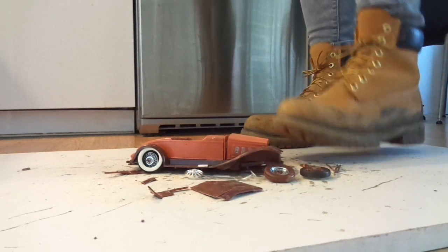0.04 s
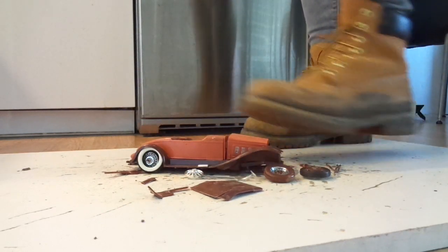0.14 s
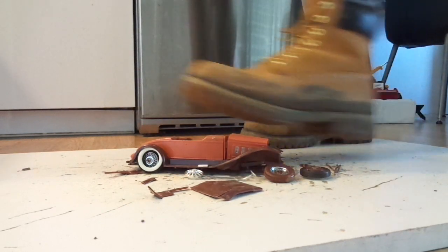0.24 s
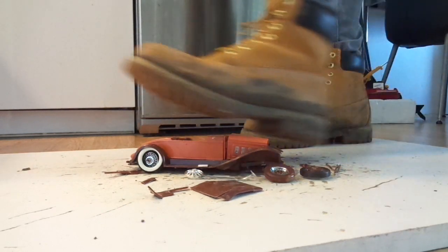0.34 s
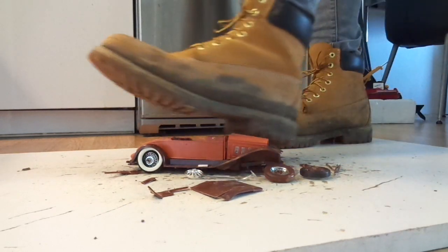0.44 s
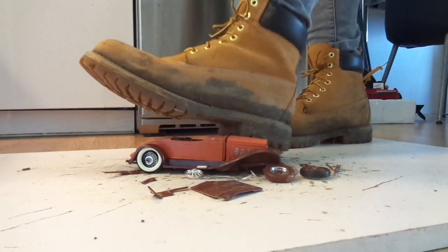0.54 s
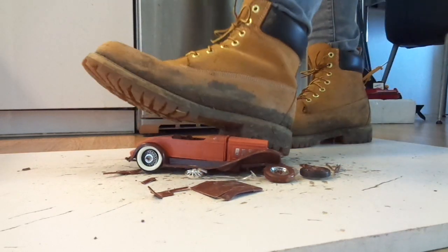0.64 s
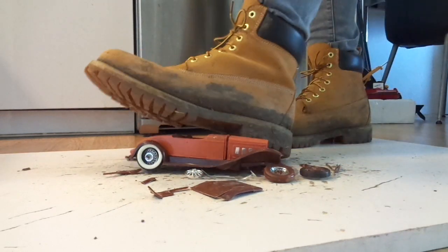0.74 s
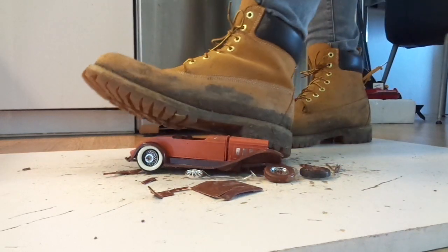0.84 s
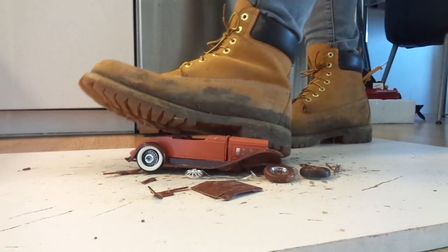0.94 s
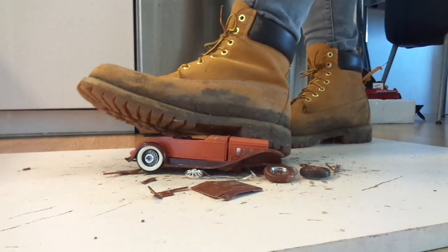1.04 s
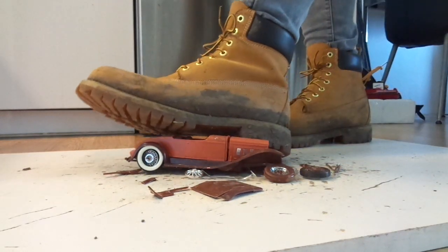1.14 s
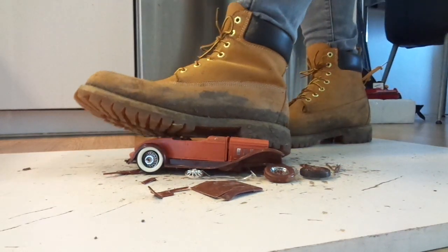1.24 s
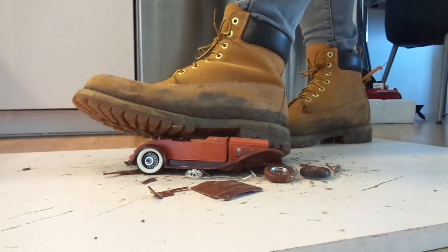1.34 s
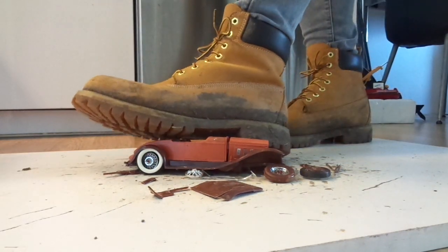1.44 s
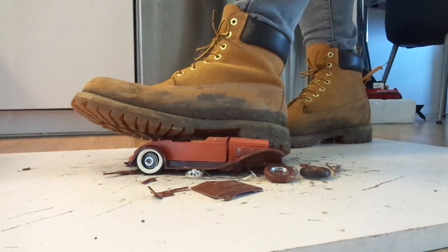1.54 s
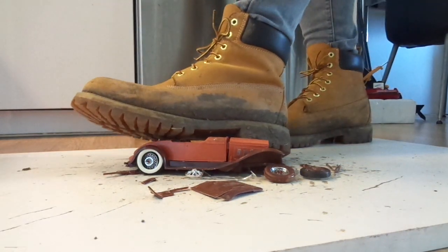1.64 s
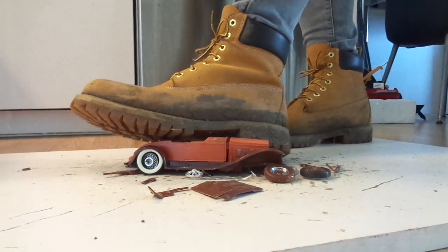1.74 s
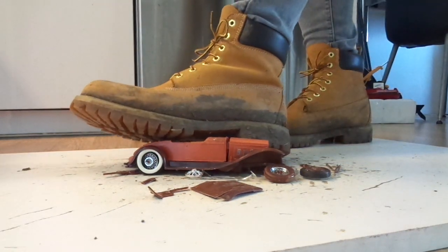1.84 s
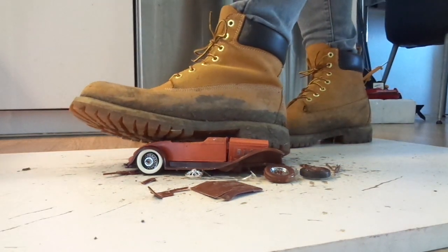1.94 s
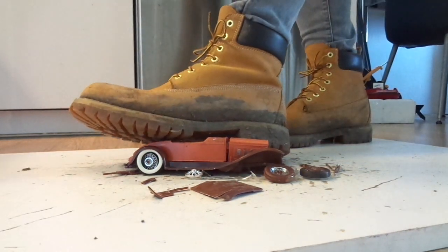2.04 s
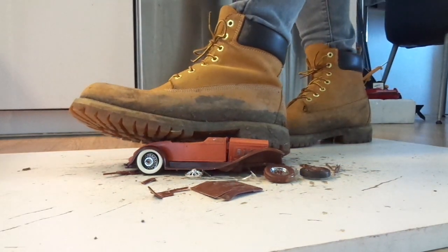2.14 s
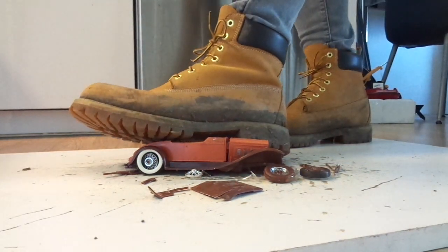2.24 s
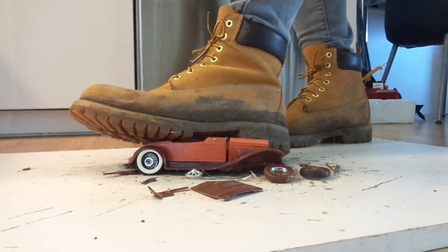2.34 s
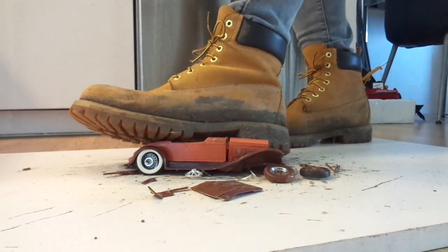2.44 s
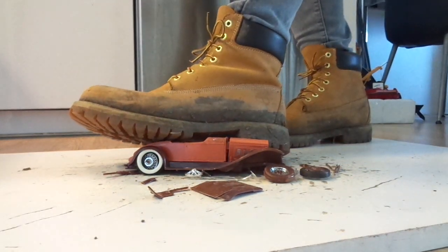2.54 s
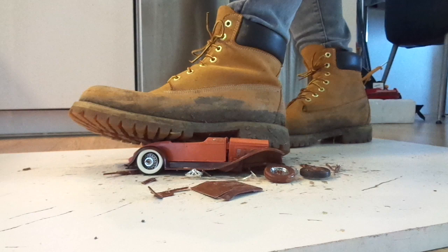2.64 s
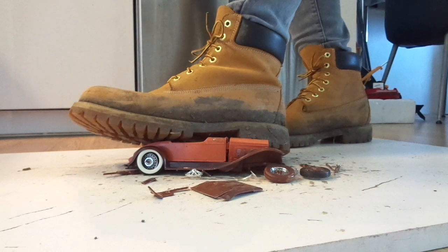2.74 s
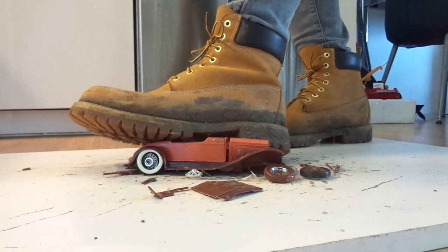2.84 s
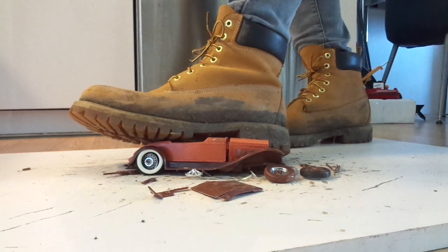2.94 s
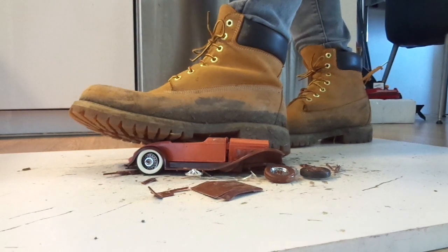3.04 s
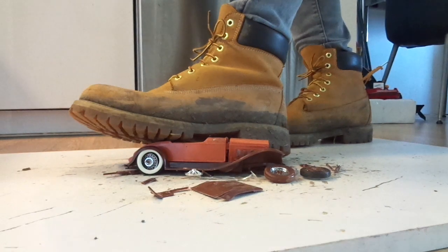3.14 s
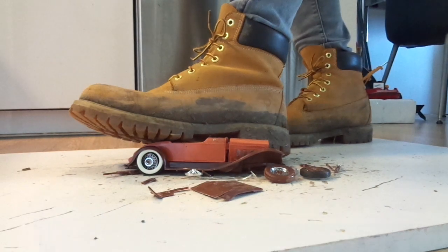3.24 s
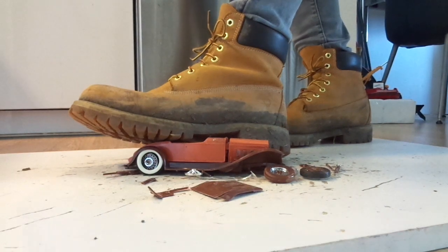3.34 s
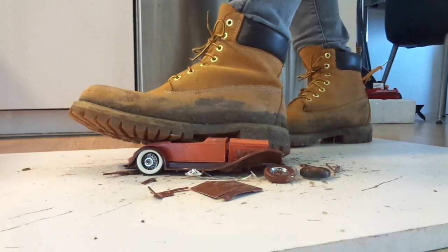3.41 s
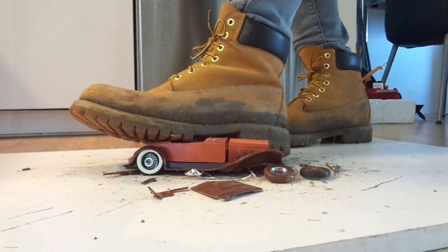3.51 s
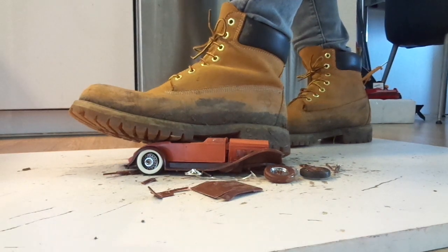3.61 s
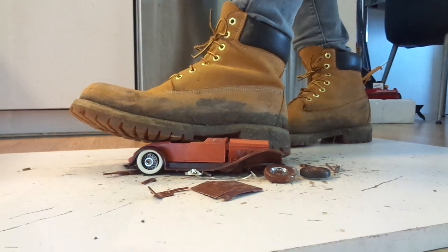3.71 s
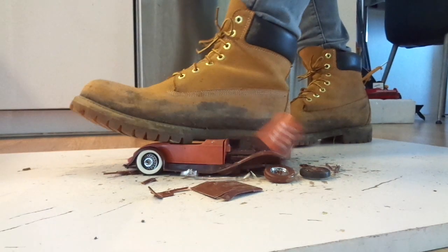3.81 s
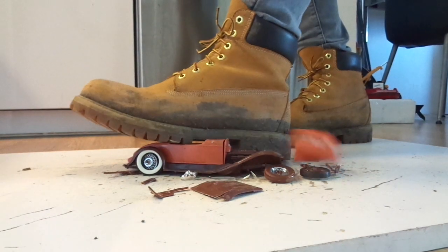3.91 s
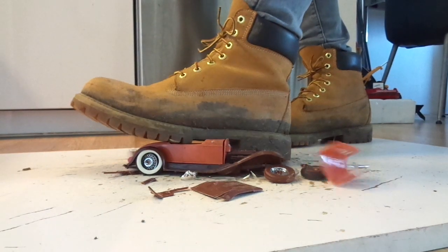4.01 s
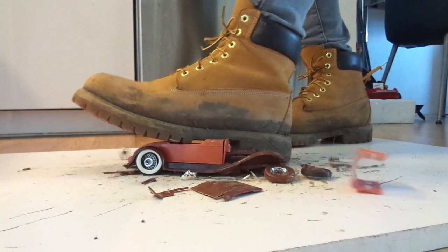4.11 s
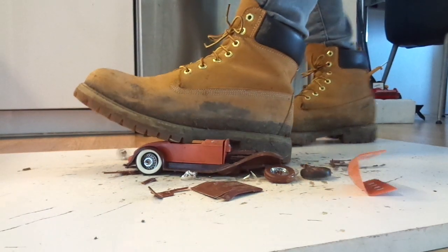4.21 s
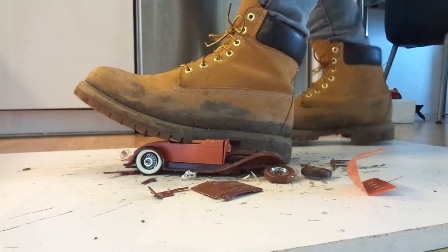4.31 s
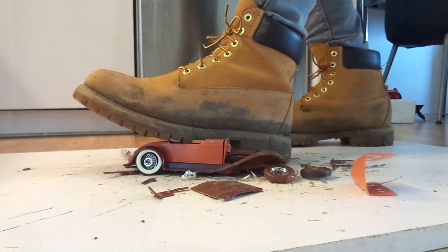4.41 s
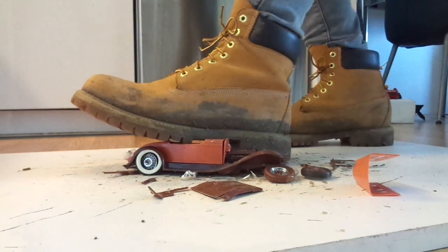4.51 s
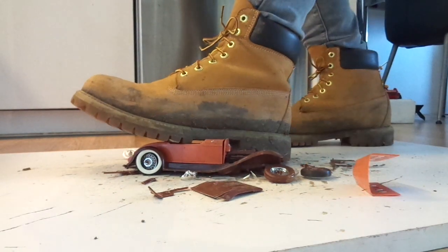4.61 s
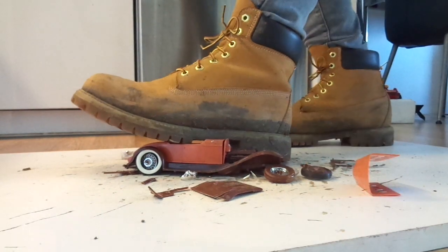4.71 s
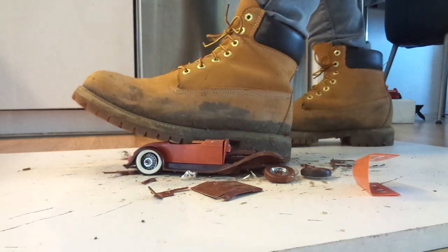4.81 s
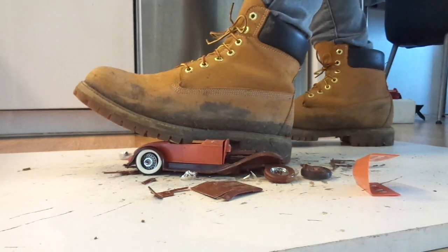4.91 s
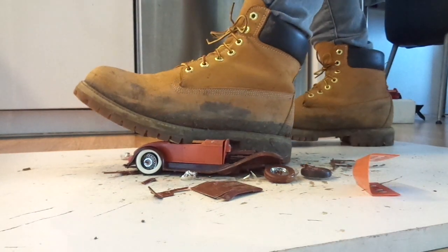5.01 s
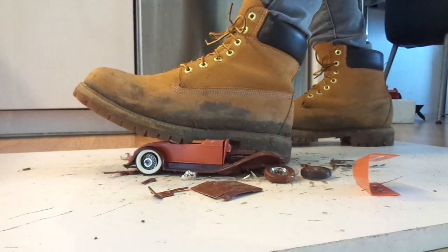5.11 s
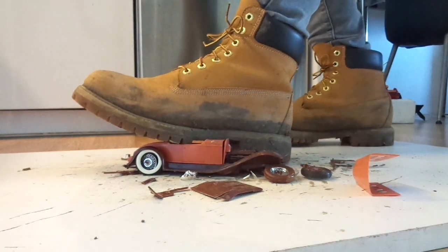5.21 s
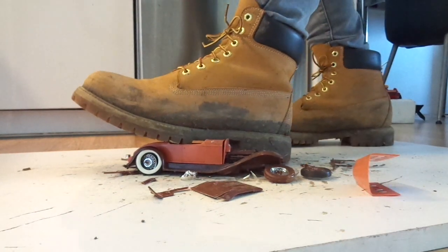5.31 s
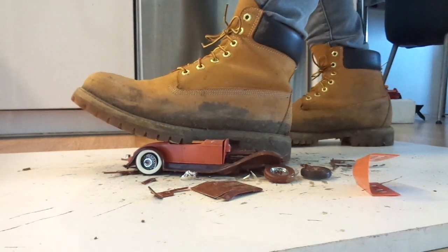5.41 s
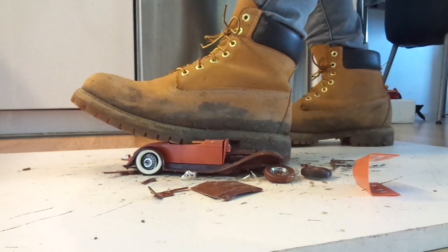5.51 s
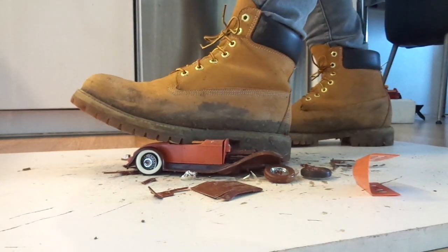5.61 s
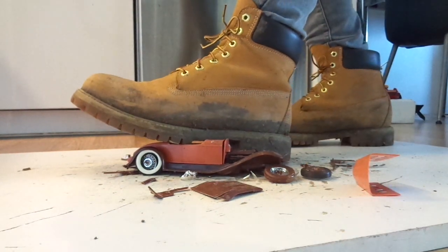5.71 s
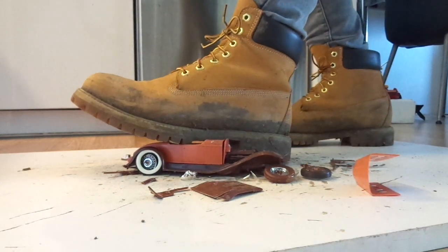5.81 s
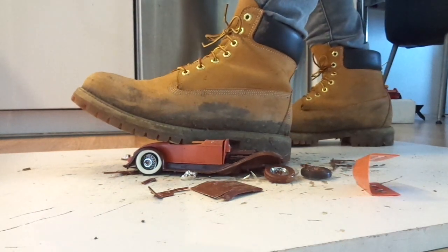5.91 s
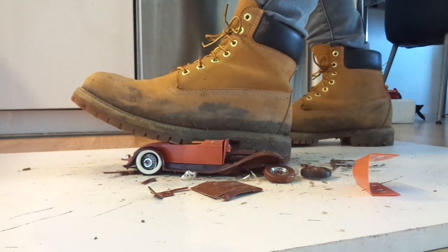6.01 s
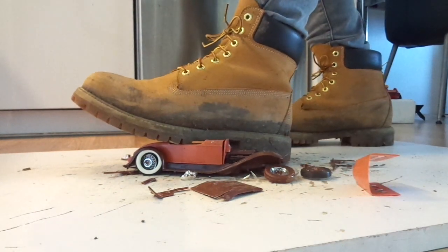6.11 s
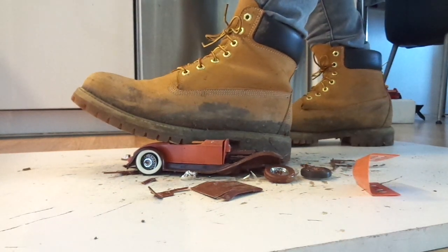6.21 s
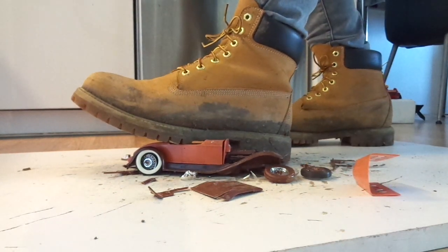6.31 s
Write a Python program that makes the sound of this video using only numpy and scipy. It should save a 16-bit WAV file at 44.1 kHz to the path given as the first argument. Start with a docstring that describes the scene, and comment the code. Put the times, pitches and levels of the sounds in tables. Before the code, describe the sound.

Faint hiss in a hard-walled kitchen gives way to gritty crackling and a run of brittle snaps as a boot bears down on a plastic toy car. Isolated cracks lead to one big break that thumps the board beneath and clips the nearby microphone. Chips scatter, fragments grind and knock together, and the crackle dies away. Each snap has a brief room echo.

```python
"""Over a faint room hiss, plastic starts to crackle, clack and snap: a heavy boot is slowly crushing
a brittle model car on a board in a bare kitchen. Splinters grind under the sole, loose pieces knock
together, and each break is a tiny burst that rings the broken piece. A low hum swells briefly and a thin
part pings. Near 3.8 s one big collapse thuds on the board, scatters shards and overloads the microphone.
The hard room answers every snap."""
import sys
import numpy as np
from scipy import signal
from scipy.fft import rfft, irfft, next_fast_len
from scipy.io import wavfile

SR = 44100
rng = np.random.default_rng(int(sys.argv[2]) if len(sys.argv) > 2 else 0)


def to_wav(sig):
    """Store sig (one row per channel, or 1-D mono) as 16-bit WAV at the path in sys.argv[1].

    Samples outside -1..1 are clipped; the rate is SR.
    """
    pcm = np.clip(np.atleast_2d(sig), -1, 1) * 32767
    pcm = np.round(pcm).astype(np.int16)
    wavfile.write(sys.argv[1], SR, pcm.T)  # frames by channels


N = 280166
T = np.arange(N) / SR


def undb(db):
    """Turn decibels into a number to multiply by."""
    return 10 ** (np.asarray(db) / 20)


def unit(x):
    """Scale each row to an energy of one."""
    return x / np.sqrt(np.sum(x ** 2, axis=-1, keepdims=True))


def fade(t, t60):
    """Die away by 60 dB in t60 seconds, the 'fade time' of the tables."""
    return np.exp(-np.log(1000) * t / np.maximum(t60, 1e-4))


def band(x, lo_hz, hi_hz, order=4):
    """Keep what lies between two pitches; a higher order cuts more sharply."""
    edges = [lo_hz, min(max(hi_hz, lo_hz + 20), SR / 2 - 20)]
    return signal.sosfilt(signal.butter(order, edges, "band", fs=SR, output="sos"), x)


def ring(t, hz, t60):
    """One fading note of a struck object."""
    return np.sin(2 * np.pi * hz * t) * fade(t, t60)


def add(track, start_s, sound):
    """Mix a sound into a track at a given time."""
    i = max(int(start_s * SR), 0)
    track[i:i + len(sound)] += sound[:N - i]


def coloured(points):
    """Noise of strength one, with its tone shaped by (f/Hz, level/dB) points."""
    hz, db = np.transpose(points)
    size = next_fast_len(N)
    f = np.maximum(np.fft.rfftfreq(size, 1 / SR), 1)
    gain = undb(np.interp(np.log(f), np.log(hz), db))
    noise = irfft(rfft(rng.standard_normal(size)) * gain, size)[:N]
    return unit(noise) * np.sqrt(N)


# the tone of the room's steady noise: f/Hz, relative level/dB
HISS_TONE = [(25, -24), (50, -17.5), (85, -8.5), (130, -9), (165, -6), (215, 0), (350, -9), (530, -6),
             (1200, -7), (2000, -10.5), (3200, -15.5), (8000, -19), (15000, -20)]

def room_hiss(level_db=-56, side_db=-18):
    """Steady room noise and hiss, slightly different in the left and right ear."""
    middle = coloured(HISS_TONE)
    side = undb(side_db) * coloured(HISS_TONE)
    return undb(level_db) * np.array([middle + side, middle - side])


def push(start_s, hold_s, release_t60, rise_s=0.041):
    """The boot's pressure rises, holds, then dies away."""
    age = T - start_s
    return np.clip(age / rise_s, 0, 1) * fade(np.maximum(age - rise_s - hold_s, 0), release_t60)


# pushes that grind the splinters: start t/s, hold/s, level/dB
PUSHES = [(0.526, 0.051, -37.5), (0.682, 0.015, -33.5), (1.347, 0.022, -40), (2.939, .04, -56),
          (3.841, 0.3, -29.5)]
# the grinding's tone: low f/Hz, high f/Hz, relative level/dB at peak load, dB gained per dB of load
GRIND_TONE = [(200, 960, -21.5, 1), (620, 1160, -20, 1), (1110, 2700, -5, 1.12), (2400, 6400, -5.5, 1.3),
              (5600, 10000, -12.5, 1.7), (9900, 16000, -21, 2)]

def grinding(idle_per_s=120, per_s_per_load=30000, click_t60=0.0095):
    """Splinters click under the sole: lone ticks under a light load, a bright crunch under a heavy one."""
    load = undb(-60.5) * push(0.44, hold_s=4.76, release_t60=3.0)  # resting weight keeps it crackling
    for start_s, hold_s, db in PUSHES:
        load += undb(db) * push(start_s, hold_s, release_t60=0.42)
    clicks_per_s = idle_per_s + per_s_per_load * load
    clicks = rng.random(N) < clicks_per_s / SR
    click_fade = fade(T[:SR // 30], click_t60)
    energy = signal.oaconvolve(clicks / clicks_per_s, click_fade ** 2)[:N]
    shake = np.sqrt(np.abs(energy))
    out = np.zeros(N)
    for lo_hz, hi_hz, db, growth in GRIND_TONE:
        gain = undb(db) * (load / load.max()) ** growth
        out += gain * unit(band(shake * rng.standard_normal(N), lo_hz, hi_hz, order=3))
    return out * np.sqrt(N) * load.max()


# the car body's own notes: f/Hz, level/dB before a lift of the high notes, fade time/s
BODY_NOTES = [(299.5, -6.5, 0.24), (1096, -17.5, 0.03), (1300, -7, 0.25), (1547, -11, 0.052),
              (1860, -4.5, 0.015), (2610, -13.5, .04), (4750, -14, 0.053), (5120, -4.5, 0.016)]

def car_body(shocks, level_db=-16):
    """Every shock leaves the rest of the car ringing faintly."""
    t = T[:SR // 2]
    notes = sum(undb(db) * unit(ring(t, hz, t60)) * np.sqrt(hz) for hz, db, t60 in BODY_NOTES)
    return undb(level_db) * signal.fftconvolve(shocks, unit(notes))[:N]


# the long tail of the kitchen's echo: f/Hz, fade time/s, relative level/dB
ECHO_TAIL = [(150, 0.23, -3.5), (524, 0.77, 2), (1330, 0.91, -3), (3020, 0.74, 2.5), (5040, 0.71, -3),
             (8000, .55, 1), (13050, 0.46, 1)]

def kitchen_echo(sound, early_db=-17, early_t60=0.13, tail_db=-15, gap_s=0.0021):
    """Sound bounces off board and cupboards, then blurs into a tail whose middle pitches last longest."""
    t = T[:SR]
    log_f = np.log(np.maximum(np.fft.rfftfreq(SR, 1 / SR), 1))
    centres = np.log([row[0] for row in ECHO_TAIL])
    spectrum = rfft(rng.standard_normal(SR))
    tail = np.zeros(SR)
    for (_, t60, db), this_band in zip(ECHO_TAIL, np.eye(len(ECHO_TAIL))):
        noise = irfft(spectrum * np.interp(log_f, centres, this_band), SR)
        tail += undb(db) * fade(t, t60) * noise
    early = rng.standard_normal(SR) ** 3 * fade(t, early_t60)  # cubing makes a few bounces stand out
    echo = undb(early_db) * unit(early * (t > gap_s)) + undb(tail_db) * unit(tail * (t > 2 * gap_s))
    return signal.oaconvolve(sound, echo)[:N]


# pitch ranges where the plastic shell rings: low f/Hz, high f/Hz, fade time as a multiple of the burst's
SHELL_RANGES = [(935.5, 2200, 2.1), (2037, 3600, 1.3), (3734, 5500, 0.84), (5340, 8880, 0.79)]

def shell_bursts(events, tone, note_gains, boost_db=20, rise_s=0.00018):
    """Each crack or knock shakes the shell into a burst of noise; the piece's own notes stand out."""
    t = T[:SR // 12]
    _, level_db, bright_db, hollow_db, t60, *notes_hz = np.transpose(events)[:, :, None]
    rise = 1 - np.exp(-t / rise_s)

    def burst(lo_hz, hi_hz, length, order=4):
        """Fading noise in one pitch range, a row for each event."""
        noise = rng.standard_normal((len(events), len(t))) * rise * fade(t, t60 * length)
        return unit(band(noise, lo_hz, hi_hz, order))

    parts = [burst(*row) for row in SHELL_RANGES]
    for k, hz, gain in zip((0, 2), notes_hz, note_gains):  # low note in range 0, any high note in range 2
        note = unit(rise * ring(t, hz, t60 * SHELL_RANGES[k][2]))
        parts[k] = unit(parts[k] + gain * note)
    parts[0] += undb(-19) * burst(560, 980, length=1)  # a hollow edge below the lowest range
    parts[-1] += undb(-7) * burst(8200, 14000, length=1.1, order=2)  # a spit of splinters on top
    shell = sum(part * undb(db + slope * bright_db) for part, (db, slope) in zip(parts, tone))
    cavity = undb(hollow_db) * burst(230, 450, length=1.9)  # the space under the shell
    out = np.zeros(N)
    for event, sound in zip(events, undb(level_db + boost_db) * (shell + cavity)):
        add(out, event[0], sound)
    return out


# knocks: t/s, relative level/dB, brightness/dB, hollowness/dB, burst fade time/s, note f/Hz
CLACKS = [(0.5623, -36, 2, -5, 0.021, 1687), (0.5899, -36.5, 11.5, -18, .022, 1800),
          (0.65, -50, 15, -8, 0.025, 2130), (0.7448, -39, -4, -22.5, 0.0084, 1500),
          (0.8155, -32, 2.5, -34, 0.022, 1250), (0.8232, -36.5, 8, -12.5, 0.021, 1350),
          (0.87, -29, 7, -11, 0.027, 1840), (1.6449, -39.5, 7, -10, 0.037, 1003),
          (1.963, -23.5, -7, -10.5, 0.037, 1125), (3.019, -44.5, 1, -4, .035, 874),
          (3.2053, -46, -9, -7.5, 0.0082, 990), (3.7915, -10.5, 0.5, -4.5, 0.01, 1800),
          (3.8025, -13, -4.5, -8.5, 0.014, 1000), (3.8075, -10.5, -5.5, -25.5, 0.0069, 1650),
          (3.8185, -14, 0, -12, 0.011, 1030), (4.1245, -18.5, 11, -42, 0.016, 1180),
          (4.3345, -18.5, -8.5, -30.5, 0.02, 1190), (4.3655, -30, -8, -23, 0.013, 1010),
          (4.3921, -31.5, 3, -3, 0.035, 1320), (4.9263, -26, 8.5, -27, 0.0081, 1390),
          (4.9828, -22, -1, -12, 0.026, 992), (5.342, -51, 16, -2, 0.022, 1090)]
# a knock's share in each shell range: level/dB, dB gained per dB of brightness
CLACK_TONE = [(2.5, 0), (-11.5, 0.96), (-12.5, 1), (-16, 0.44)]

def clacks():
    """Loose pieces knock together and on the board, each with one short note."""
    return shell_bursts(CLACKS, CLACK_TONE, note_gains=[undb(1)])


# breaks: t/s, relative level/dB, brightness/dB, hollowness/dB, burst fade time/s, low f/Hz, high f/Hz
SNAPS = [(0.6837, -17, -2.5, -15, .028, 1905, 4980), (0.9363, -12.5, 4, -27.5, 0.039, 1510, 4860),
         (1.0404, -16.5, 2, -21.5, .012, 1506, 5030), (1.2692, -13.5, 1.5, -36, .042, 1090, 3760),
         (1.3204, -17.5, 1, -27, .045, 1930, 4850), (1.4205, -38.5, 8, -23, .019, 2000, 4300),
         (2.2549, -12, .5, -21.5, .038, 1147, 3880), (3.038, -31, -1.5, -13.5, .022, 1596, 4950),
         (3.2466, -43.5, -3, -17, .028, 1097, 4870), (3.2733, -51, -1.5, 1, .022, 1010, 4910),
         (3.5195, -8.5, 0.5, -21, .013, 1520, 4695), (3.7333, -23, -1, -20, .017, 1680, 4540),
         (3.7447, -26.5, -1.5, -28.5, .028, 1440, 5160), (3.7799, -24, .5, -18, .01, 1140, 4430),
         (3.7866, 2.5, 0, -16.5, .034, 1046, 4540), (3.807, -7.5, 3, -27.5, .009, 1710, 4550),
         (3.9992, -12, 0, -36, .011, 1800, 3920), (4.1045, -21.5, 1.5, -28, .029, 1690, 4110),
         (4.124, -22.5, 7.5, -40, .017, 1170, 5300), (4.5201, -11.5, -1, -19.5, .018, 1870, 4650)]
# a break's share in each shell range: level/dB, dB gained per dB of brightness
SNAP_TONE = [(-4, -2), (-5.5, -0.03), (-1, 0.75), (-5.5, 1.23)]

def snaps():
    """A crack runs through brittle plastic and rings the broken piece at a low and a high note."""
    return shell_bursts(SNAPS, SNAP_TONE, note_gains=[undb(-5.5), 0.3])


# how the hum swells: t/s, strength from 0 to 1
HUM_SWELL = [(1.4, 0.15), (1.8, 0.8), (2.4, 0.65), (2.7, 1), (3.1, 0.25)]

def hum(hz=86, peak_db=-67):
    """A faint low hum grows for a moment, then sinks back."""
    swell = np.interp(T, *np.transpose(HUM_SWELL))
    return undb(peak_db) * swell * np.sin(2 * np.pi * hz * T)


# flicks of a thin loose part: t/s, level/dB, fade time/s
PINGS = [(2.254, -26, 0.16), (4.521, -44, 0.44), (4.929, -55.5, 1.1)]

def pings(hz=6930):
    """A thin loose part holds one high note after it is flicked."""
    out = np.zeros(N)
    for start_s, db, t60 in PINGS:
        add(out, start_s, undb(db) * ring(T[:SR], hz, t60))
    return out


# the board's own notes: f/Hz, relative level/dB, fade time/s
BOARD_NOTES = [(192, -13, 0.03), (294, -6, 0.24), (368, 1, 0.06), (506, -11, 0.25), (592, -5, 0.035)]
# weight landing on the board, and at 4.37 s the other boot stepping down: t/s, relative level/dB, extra
# level/dB for the low thump
THUDS = [(3.79, -24.5, 16), (4.001, -49, 8), (4.128, -48, 8.5), (4.3655, -19.5, -17), (4.985, -29.5, -24)]

def thuds(thump_hz=66, thump_t60=0.015):
    """The boot drops its weight on the board, and once the other boot steps down; a deep, dead low thump sounds
    under the board's ring."""
    out, t = np.zeros(N), T[:SR // 2]
    board = sum(undb(db) * ring(t, hz, t60) * (-1) ** k for k, (hz, db, t60) in enumerate(BOARD_NOTES))
    board = band(board, 150, 2000, order=1)  # a small board gives off little bass
    thump = ring(t, thump_hz, thump_t60)
    for start_s, db, thump_db in THUDS:
        add(out, start_s, undb(db) * (board + undb(thump_db) * thump) / 2)
    return out


def shards(count=22, start_s=3.86, spread_s=0.37, low_hz=3470, high_hz=11950, t60=0.016):
    """Chips flung out by the collapse patter down at random, each with two short, high notes."""
    out, t = np.zeros(N), T[:SR // 30]
    for when, size, *pitches in rng.random((count, 4)):
        tick = sum(ring(t, low_hz * (high_hz / low_hz) ** pitch, t60) for pitch in pitches)
        level_db = -16 + 6 * size
        add(out, start_s + spread_s * when, undb(level_db) * unit(tick))
    return out


def scene(directions=4, side_db=-23, treble_side_db=-25):
    """The shell sounds different in each direction; one reaches us directly, the room mixes them all."""
    cracks = [snaps() + clacks() for _ in range(directions)]
    grit = grinding() + shards()
    shared = grit + car_body(cracks[0] + grit) + thuds()  # the same in every direction
    echoes = [kitchen_echo(crack + shared) for crack in cracks]
    middle = cracks[0] + shared + pings() + sum(echoes) + hum()
    # left and right are nearly alike; they differ most in the high treble
    side = undb(side_db) * (echoes[0] - echoes[1])
    side += undb(treble_side_db) * band(cracks[1] + echoes[2], 8000, 16000, order=1)
    return np.array([middle + side, middle - side]) + room_hiss()


def record(dry, top_hz=15200):
    """The biggest snaps overload a nearby phone, which flattens their peaks and cuts the highest treble."""
    treble_cut = signal.ellip(10, 0.1, 70, top_hz, fs=SR, output="sos")
    return signal.sosfilt(treble_cut, np.clip(dry, -1, 1))


dry = scene()
out = record(dry)
to_wav(out)
```